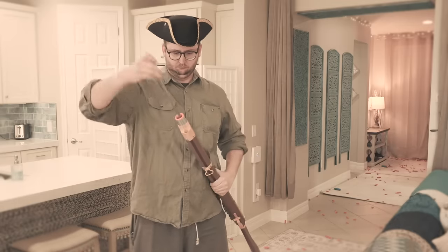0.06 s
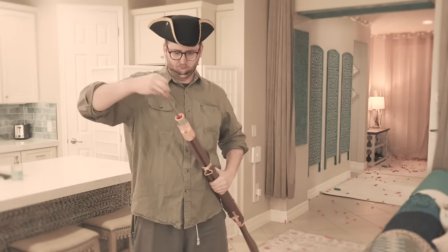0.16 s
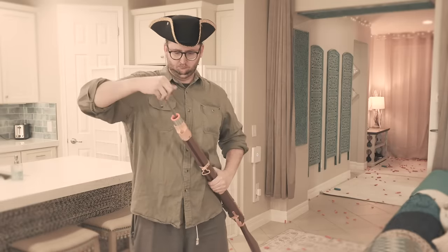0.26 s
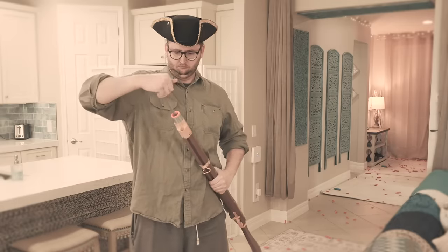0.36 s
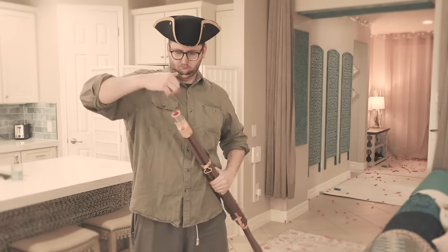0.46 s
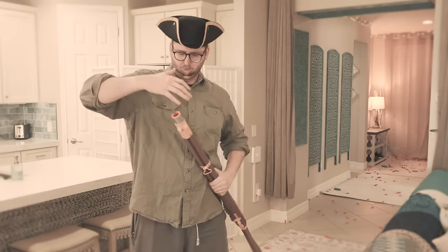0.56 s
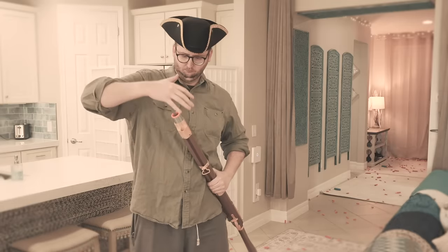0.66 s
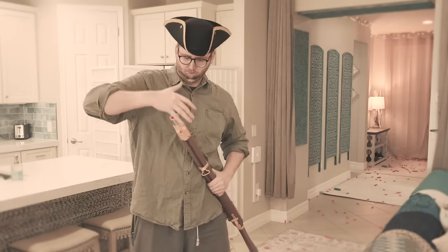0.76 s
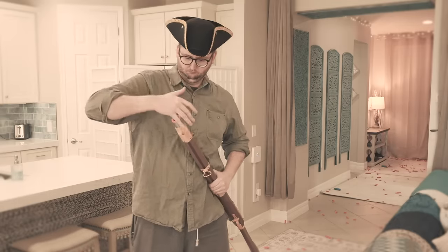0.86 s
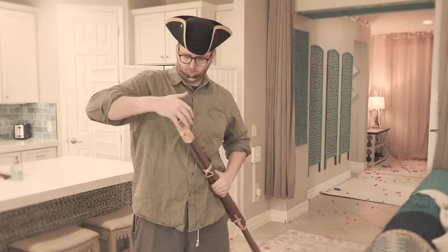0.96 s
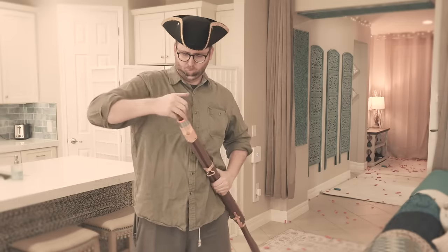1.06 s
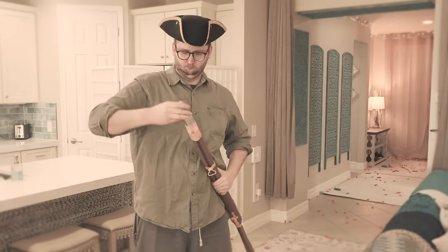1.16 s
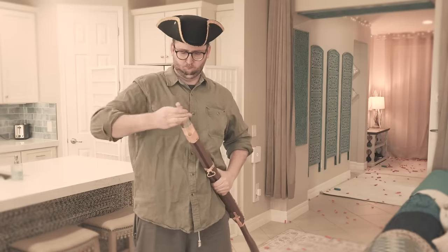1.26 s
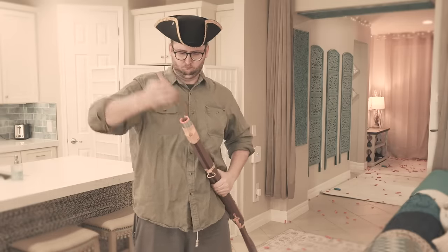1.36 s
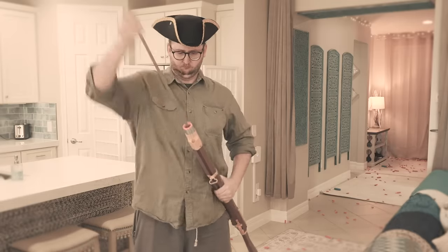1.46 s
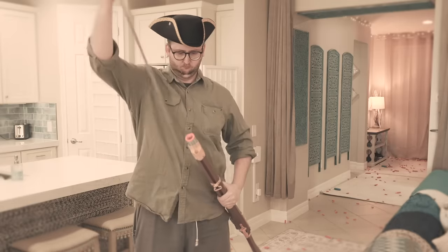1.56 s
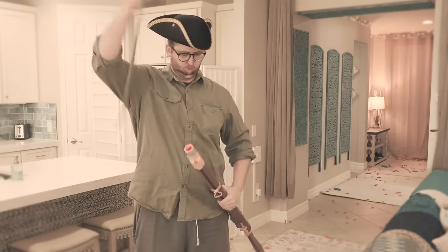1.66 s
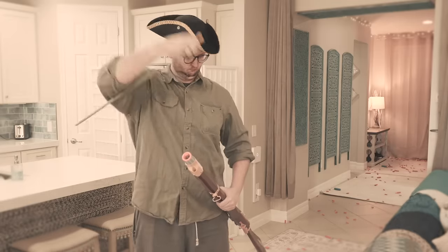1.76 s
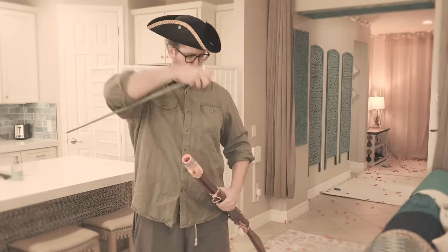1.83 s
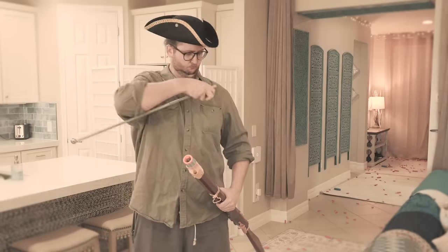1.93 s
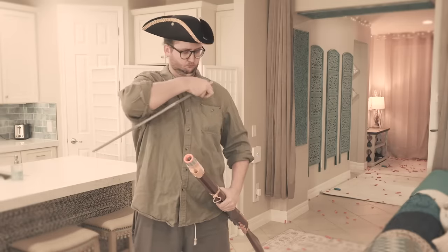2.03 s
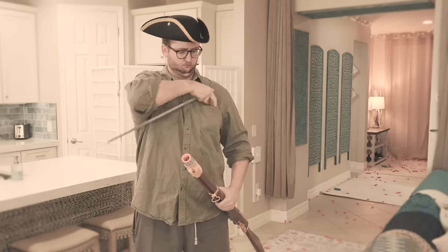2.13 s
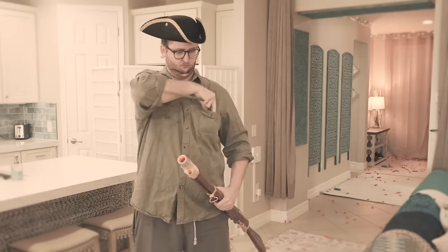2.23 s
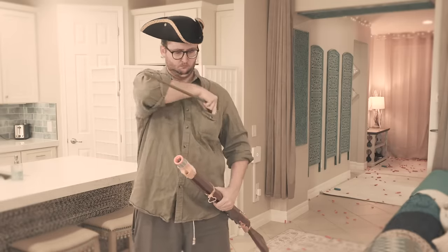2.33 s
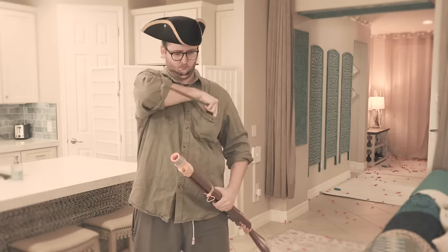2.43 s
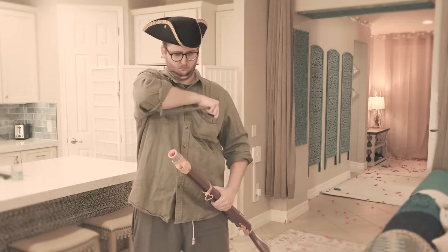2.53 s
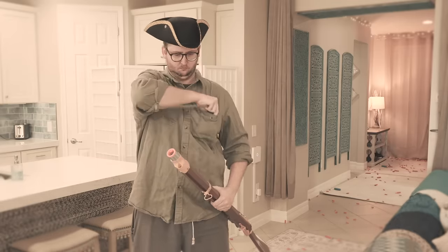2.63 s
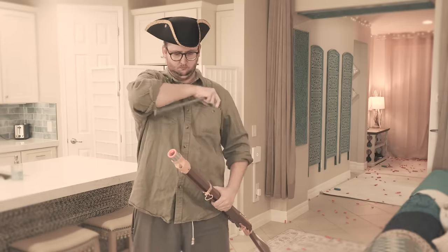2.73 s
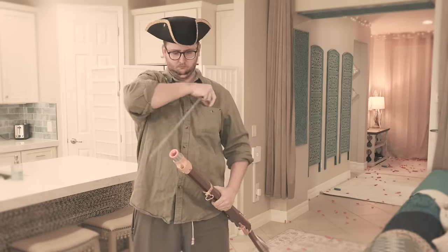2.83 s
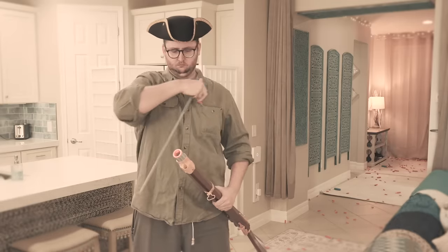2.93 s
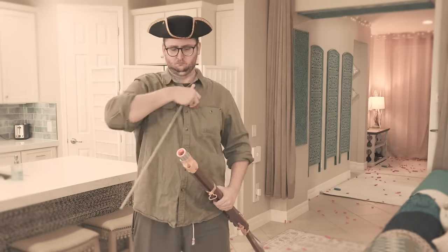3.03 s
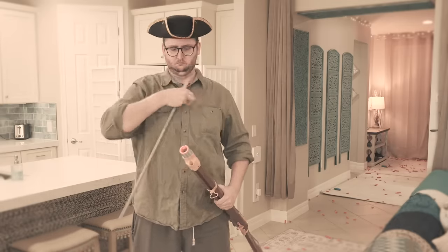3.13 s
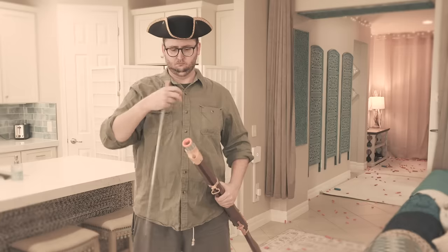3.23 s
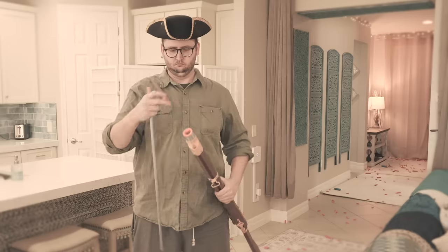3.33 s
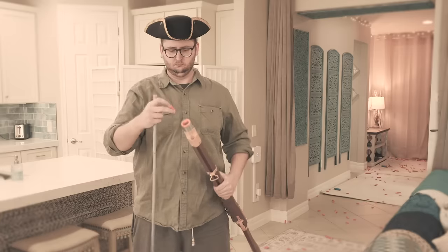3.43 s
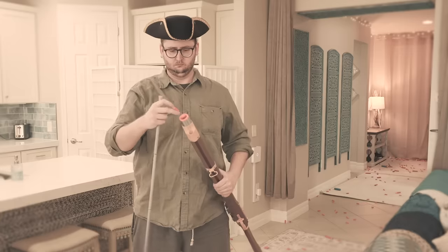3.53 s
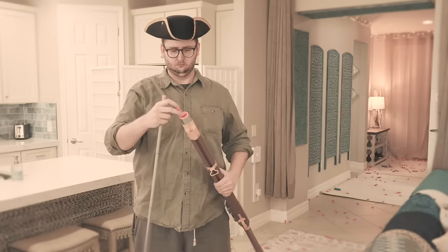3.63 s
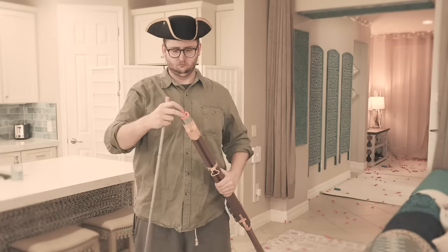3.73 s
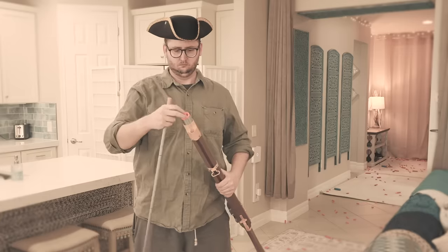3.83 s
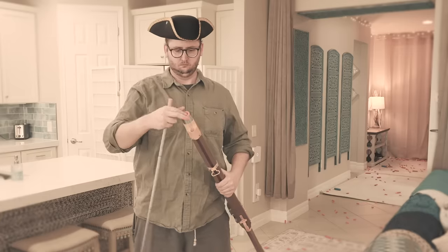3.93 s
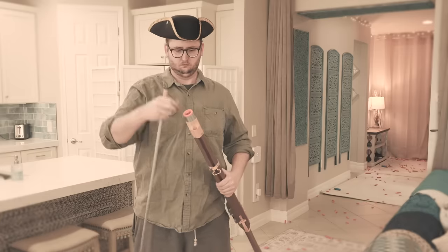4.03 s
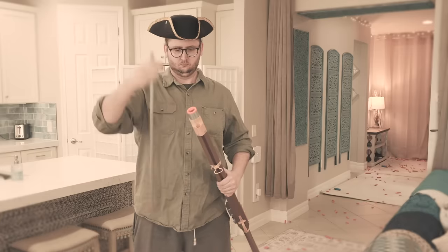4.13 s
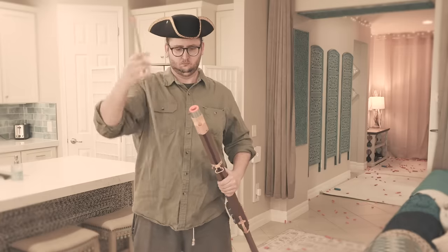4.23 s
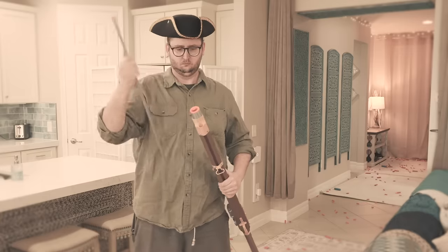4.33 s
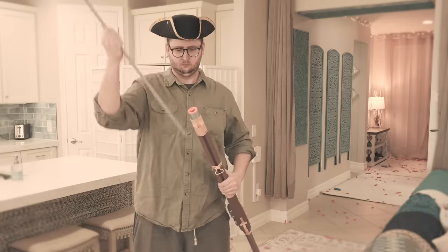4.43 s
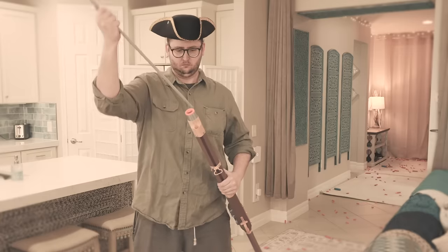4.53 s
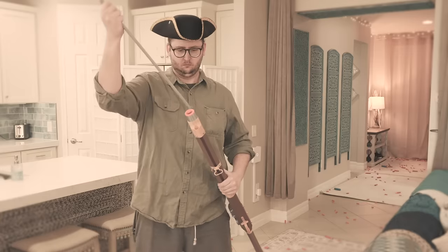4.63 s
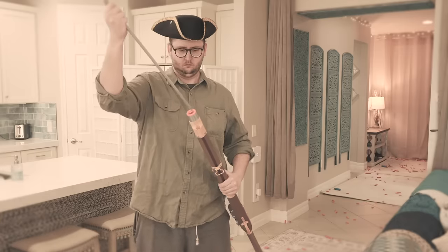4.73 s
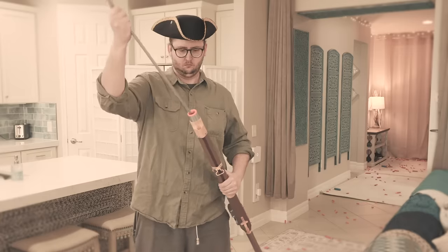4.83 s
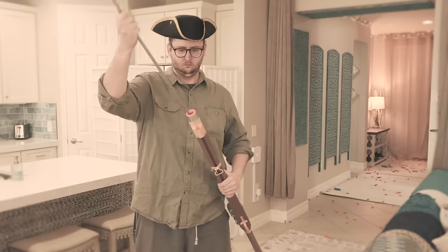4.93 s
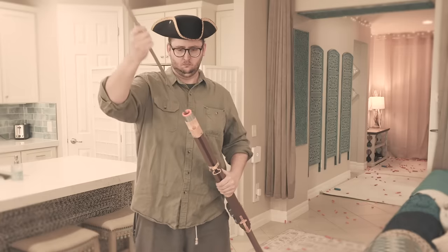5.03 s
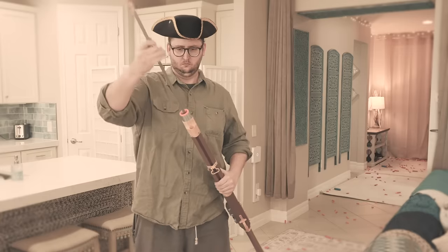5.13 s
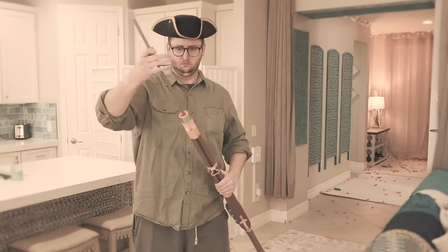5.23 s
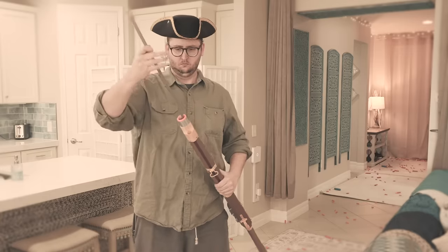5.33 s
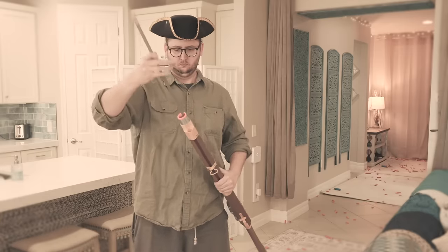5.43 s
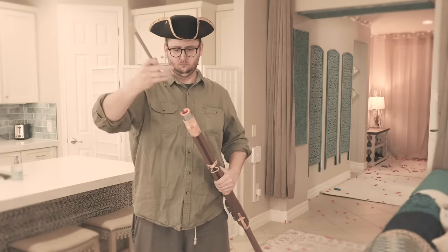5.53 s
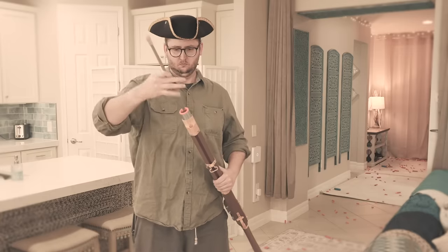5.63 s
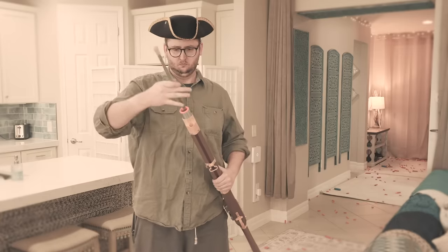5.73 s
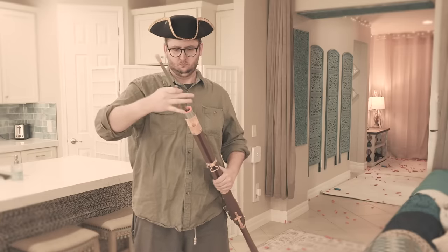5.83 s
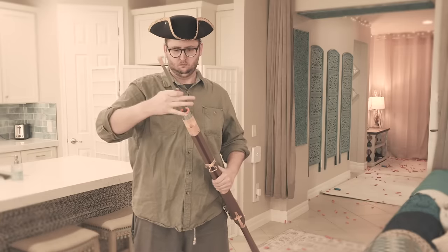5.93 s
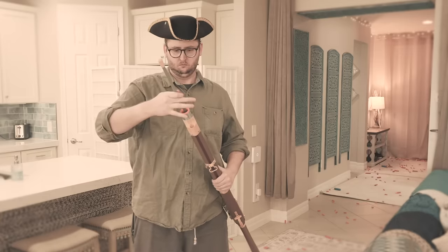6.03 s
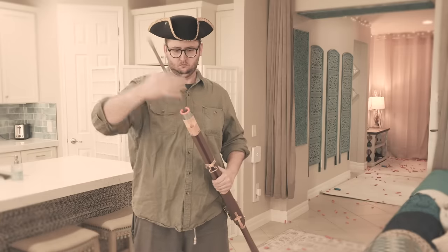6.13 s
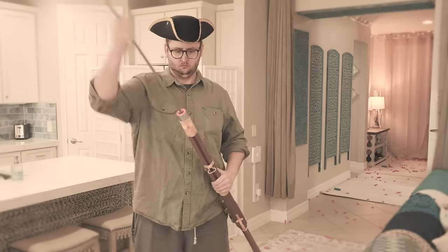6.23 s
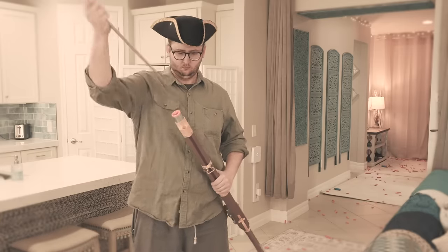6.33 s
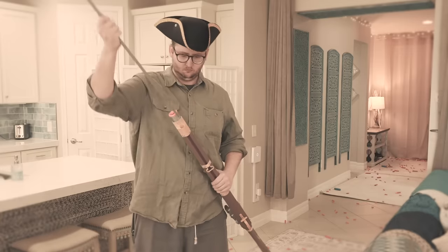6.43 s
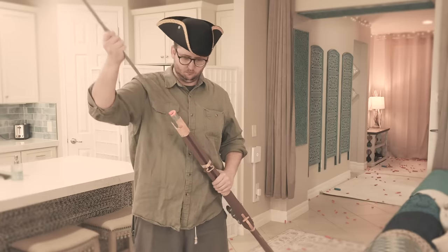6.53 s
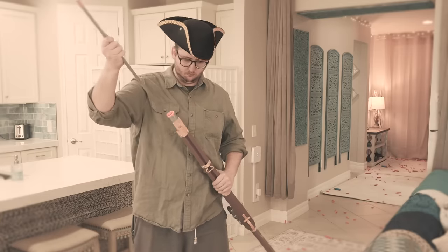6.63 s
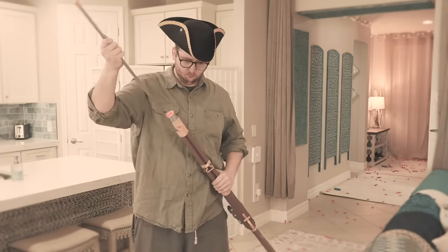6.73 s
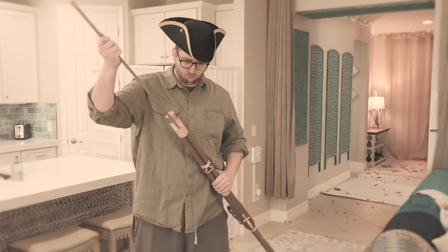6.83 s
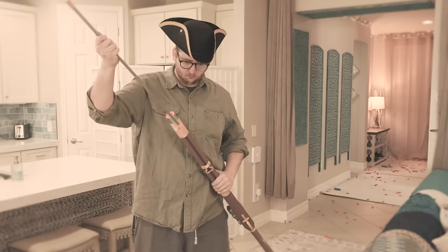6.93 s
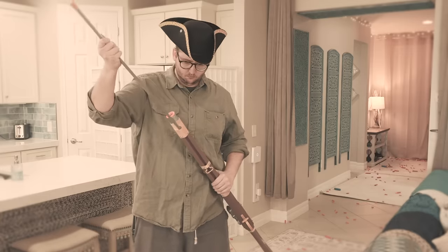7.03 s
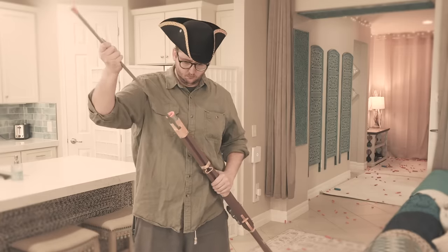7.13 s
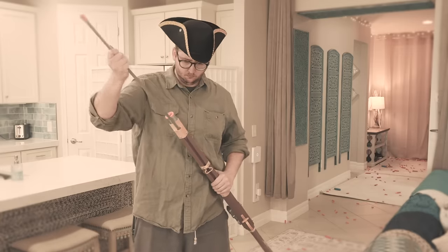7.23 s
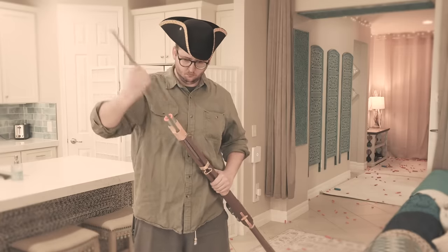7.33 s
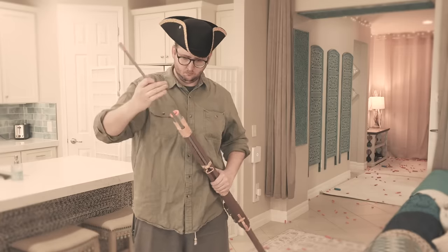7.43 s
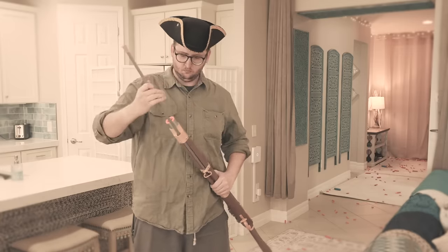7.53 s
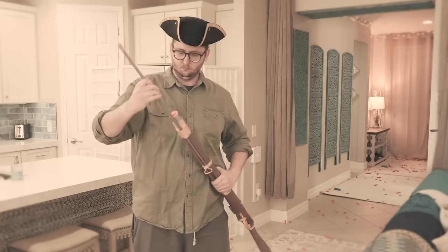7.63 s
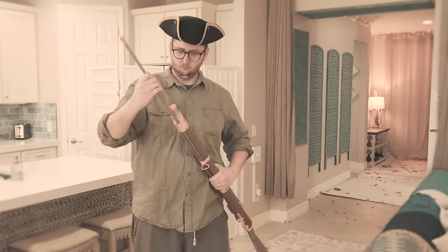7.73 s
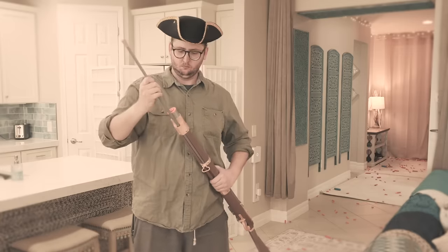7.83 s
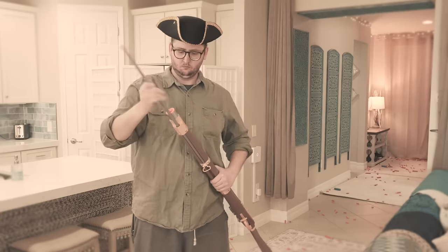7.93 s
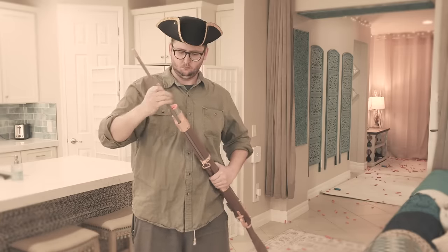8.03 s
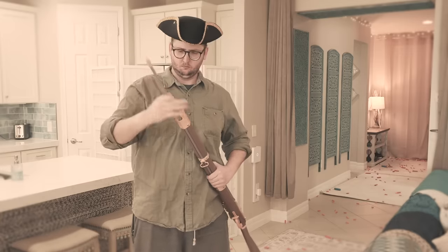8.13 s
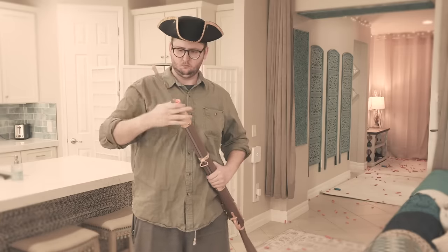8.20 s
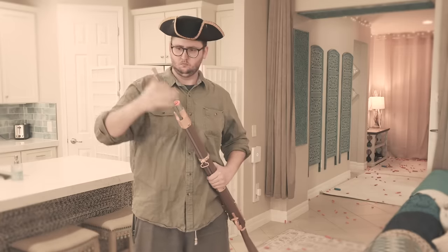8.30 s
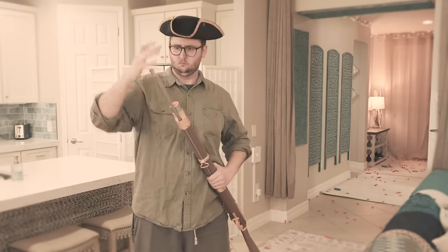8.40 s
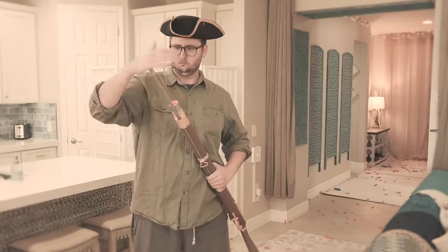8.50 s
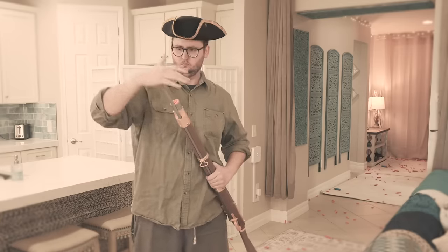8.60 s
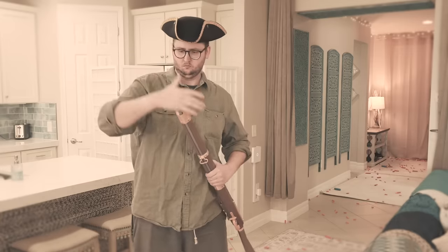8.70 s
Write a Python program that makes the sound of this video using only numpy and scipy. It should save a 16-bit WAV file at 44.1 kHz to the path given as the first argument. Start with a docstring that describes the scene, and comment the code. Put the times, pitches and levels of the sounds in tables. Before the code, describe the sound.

In a quiet living room, a ramrod clicks and rasps in a toy musket's plastic barrel, with a low hollow knock and two loud sharp snaps as it comes free. A few seconds of near silence follow, with faint cloth rustle and soft rod taps. Then it ticks, squeaks briefly, scrapes and knocks its way back in. Close mono microphone, short room reverb, faint refrigerator hum.

```python
"""In a living room with an open kitchen, a ramrod is worked in the plastic barrel of a toy musket.
It scrapes along the bore (friction noise through tube resonances), knocks home (impulses on the wall
and stock), snaps free of the muzzle and is turned in the hand (bending modes, rustling cloth),
then taps its way back in and slides down. Behind it a refrigerator hums (beating sinusoids) in still
air (shaped noise), with a faint drone (narrow-band noise)."""
import sys
import numpy as np
from scipy import signal
from scipy.fft import rfft, irfft, next_fast_len
from scipy.io import wavfile
from scipy.ndimage import uniform_filter1d, map_coordinates

SR = 44100
rng = np.random.default_rng(int(sys.argv[2]) if len(sys.argv) > 2 else 0)


def put_to_file(sound):
    """Save the sound as 16-bit audio at rate SR, in the file named by the first command-line argument."""
    columns = np.atleast_2d(sound).T  # one column per channel
    safe = np.clip(columns, -1, 1)
    whole_steps = np.round(safe * 32767)
    wavfile.write(sys.argv[1], SR, whole_steps.astype(np.int16))


N = 386438
SIZE = 16384  # samples in one short sound, and in a colouring filter

# a tap on the plastic wall, spectrum: (f/Hz, level/dB)
WALL_SPECTRUM = [(130, -25.5), (330, -7.5), (600, -7), (900, 3), (2200, 1), (3200, 2.5), (5400, -3),
                 (6600, -6), (10500, -7), (15500, -21.5)]
# wall modes favoured by soft, medium and hard contacts: (f/Hz)
WALL_MODES = [2250, 3020, 5100]
# what hardness does to a click: (softest contact, hardest contact)
BODY_DB = (9, -13.5)  # spectrum at and below 1500 Hz
CHATTER_T60_S, RISE_S = (0.057, 0.027), (0.0011, 0.0004)
SNAP = (2.5, 4.7)  # amplitude of the first touch, over the chatter


def click(hardness, edge_db, tube_db=5, mode_db=5, mode_width_hz=400):
    """Impact excitation: a snap and chatter ring the wall; harder is shorter, thinner and higher."""
    t = np.arange(SIZE) / SR
    rise = 1 - np.exp(-t / between(RISE_S, hardness))
    chatter = rng.standard_normal(SIZE) * fade(t, between(CHATTER_T60_S, hardness)) * rise
    chatter[0] = between(SNAP, hardness)
    contact = [(1500, between(BODY_DB, hardness)), (2600, 0), (5600, 0.0098), (7500, edge_db)]
    # hardness crossfades from each wall mode to the next
    mode_position = 2 * np.clip(hardness, 0, 1)
    shares = np.maximum(1 - np.abs(mode_position - np.arange(len(WALL_MODES))), 0)

    def colour(hz):
        """Modal superposition: wall, contact, tube and favoured modes add in dB."""
        modes = sum(share * bump(hz, centre, mode_width_hz) for share, centre in zip(shares, WALL_MODES))
        return along(WALL_SPECTRUM, hz) + along(contact, hz) + tube_db * barrel(hz) + mode_db * modes

    return unit_peak(coloured(chatter, colour))


CLICK_WET_DB = (-5.5, -8)  # room re the direct sound: (softest contact, hardest contact)
# rod against barrel: (t/s, level/dB before a common trim, hardness 0-1, edge from 7.5 kHz up/dB)
ROD_CLICKS = [(0.026, -25.5, 0.97, -1), (0.0403, -25, 0.91, 0.5), (0.2109, -32, .85, -5.5),
              (0.2298, -31.5, 0.2, -2.5), (0.2438, -27.5, 0.09, -2.5), (0.7224, -45, 0.65, 0.5),
              (0.788, -31.5, 0.7, -8), (0.8659, -15, .95, -7.5), (1.1196, -38, 0.07, -7.5),
              (1.1412, -37.5, 0, -6.5), (1.4296, -37.5, 1, -1), (1.5291, -17.5, 0.93, 4.5),
              (4.8581, -38, 0.67, -10), (4.9044, -38.5, 0.5, -20), (5.2185, -39.5, 0.53, -3.5),
              (5.2344, -25.5, 0.53, -7.5), (5.3927, -38.5, 0.58, -9), (5.4271, -37, 0.32, -6),
              (5.476, -34, 0.21, -1), (5.7803, -44, 0.15, -3), (5.8556, -48, 0.01, -4.5),
              (6.3027, -33, 0.81, 3), (6.5979, -30.5, .6, -7.5), (6.9311, -38, 0.44, -6),
              (7.02, -50, 0.5, -16), (7.4586, -23, 0.92, -7), (7.4611, -23, .75, -2), (7.4654, -26, .3, -6),
              (7.6031, -46.5, 0, -5.5), (7.6914, -42.5, 0.32, -5.5), (7.7533, -44, 0.06, -8),
              (7.9334, -47, 0.32, -8.5), (7.989, -48.5, 0.3, 4.5), (8.0035, -35.5, 0.18, -11.5)]


def clicks():
    """Impact sound: the rod strikes the barrel, and contact hardness sets the spectrum."""
    out = np.zeros(N)
    for s, db, hardness, edge_db in ROD_CLICKS:
        strike = amp(db - 2.5) * click(hardness, edge_db)
        add(out, s, in_room(strike, wet_db=between(CLICK_WET_DB, hardness)))
    return out


# tube resonances of the barrel: (f/Hz, width/Hz, relative weight/dB)
TUBE_MODES = [(1246, 110, -2.5), (1738.5, 250, -12), (2140, 260, -5), (3180, 80, -12.5), (3500, 600, -6.5),
              (5070, 890, 0.5), (5500, 80, -8)]


def barrel(hz):
    """Tube resonance: the weighted sum of the barrel's peaks at each frequency."""
    return sum(amp(db) * bump(hz, centre, width) for centre, width, db in TUBE_MODES)


# rasp at the muzzle, spectrum: (f/Hz, level/dB)
RASP_SPECTRUM = [(900, -42), (1900, -6.5), (2900, 6), (4300, -2), (5300, -2), (6500, -13.5), (8500, -14),
                 (15500, -37)]
# rub inside the bore, spectrum: (f/Hz, level/dB)
RUB_SPECTRUM = [(120, -31.5), (320, 0), (650, -4.5), (1000, 2.5), (1800, -3), (2800, -13), (6000, -45)]
# smooth hiss of the contact, spectrum: (f/Hz, level/dB)
HISS_SPECTRUM = [(3000, -34.5), (6200, 3), (10000, -1), (13000, -5.5), (16000, -17)]
# what depth does to the scrape, in dB re its rasp: (at the muzzle, deep in the bore)
RUB_DB, HISS_DB = (-4, 6), (-6.5, -27)
GRIP_S, GRIP_DOUBLES_DB = 0.0062, 9  # time to take hold; it doubles with this much swell


def scrape(length, swell_db, depth, tube_db=6, judder_db=1.82, ping_db=-1, release=.02):
    """Sliding friction: rasp at the muzzle, rub in the bore, juddering; deeper is hollower and duller."""
    t = np.arange(SIZE) / SR
    progress = np.minimum(t / length, 1)
    grip_s = GRIP_S * 2 ** (swell_db / GRIP_DOUBLES_DB)
    grip = (1 - np.exp(-t / grip_s)) * fade(np.maximum(t - length, 0), release)
    pressure = amp(swell_db * (progress - .5) + judder_db * wobble(155.5)) * grip
    slips = friction(slip_rate=2000, spread_db=2.5, smooth_db=0.5)
    grain = slips + amp(ping_db) * pings(t60=.012, count=1200)
    rasp = unit(coloured(grain, lambda hz: along(RASP_SPECTRUM, hz) + tube_db * barrel(hz)))
    rub = unit(coloured(grain, lambda hz: along(RUB_SPECTRUM, hz) + tube_db * barrel(hz)))
    hiss = unit(coloured(slips, lambda hz: along(HISS_SPECTRUM, hz)))
    contact = rasp + amp(between(RUB_DB, depth)) * rub + amp(between(HISS_DB, depth)) * hiss
    return amp(-4.5) * pressure * contact


def friction(slip_rate, spread_db, smooth_db, size=SIZE):
    """Random impulse process: tiny slips of uneven size, slip_rate a second, over a smooth hiss."""
    struck = rng.random(size) < slip_rate / SR
    slips = struck * rng.standard_normal(size) * amp(spread_db * rng.standard_normal(size))
    return unit(unit(slips) + amp(smooth_db) * rng.standard_normal(size))


def pings(t60, count, size=300):
    """Modal excitation: scattered slips each ring one random wall mode for a few milliseconds."""
    when, pitch, phase = rng.random((3, count, 1))
    t = np.arange(size) / SR
    hz = 600 * 12 ** pitch
    # high modes lie sparser on this log scale, so they are struck harder to keep the sum even
    strength = np.sqrt(hz) * rng.exponential(size=(count, 1))
    grains = strength * np.sin(2 * np.pi * (hz * t + phase)) * fade(t, t60)
    place = (when * SIZE).astype(int) + np.arange(size)
    return unit(np.bincount(place.ravel(), grains.ravel(), minlength=SIZE)[:SIZE])


# the rod is pushed or drawn along the bore:
# (t/s, length/s, relative level/dB, swell from start to end/dB, depth of the contact 0-1)
STROKES = [(0.000, 0.165, -48, -3, .35), (0.45, .21, -71.5, -2, 1), (0.66, .12, -52.5, 15, .85),
           (0.788, .1, -39, -15, .15), (1.1, .18, -58, 0, .9), (1.335, 0.21, -50, 9, 0.49),
           (1.528, .035, -35, -9, 0), (4.92, 0.18, -63, -4.5, 0.48), (5.434, 0.18, -59, -13, .7),
           (5.600, 0.0597, -57.5, 11, .25), (6.134, 0.12, -46, 13, .25), (6.758, .14, -72, 10.5, 0.3),
           (7.014, .24, -64.5, 7.5, 0.55), (7.315, 0.12, -48.5, 18.5, .15), (7.70, 0.37, -64.5, 4, 0.54),
           (8.008, 0.055, -49.5, -6, .2), (8.096, 0.0815, -60.5, 14.5, .35), (8.175, .084, -45.5, -6.5, .1),
           (8.617, .14, -49.5, -2.5, .15)]
# the rod glances off the wall: (t/s, relative level/dB, depth of the contact 0-1)
GLANCES = [(0.018, -41, 0), (0.174, -41, 0.3), (0.386, -36.5, 0.26), (0.403, -34.5, 0.4),
           (1.034, -50.5, 0.83), (1.268, -49.5, 1), (1.44, -45, 0), (1.512, -38.5, 0.23),
           (5.125, -50.5, 0.1), (5.733, -51.5, 0.45), (5.995, -53.5, 0.45), (6.011, -52.5, 0.12),
           (6.638, -43, 0.6), (7.267, -44.5, 0.23), (7.277, -42.5, .15), (8.738, -40, 0.16)]
SCUFF_S, SCUFF_SWELL_DB = .019, -2.5


def slides():
    """Friction noise: strokes along the bore and brief glancing scuffs."""
    out = np.zeros(N)
    for s, length, db, swell_db, depth in STROKES:
        add(out, s, in_room(amp(db) * scrape(length, swell_db, depth), wet_db=-7.5))
    for s, db, depth in GLANCES:
        add(out, s, in_room(amp(db) * scrape(SCUFF_S, SCUFF_SWELL_DB, depth), wet_db=-6.0))
    return out


# the whole stock when knocked, spectrum: (f/Hz, level/dB)
KNOCK_SPECTRUM = [(50, -33), (140, -14.5), (250, -5.5), (420, -3.5), (750, -4.5), (1300, -14), (3000, -45)]
# resonances of the hollow stock: (f/Hz, width/Hz, lift/dB)
STOCK_MODES = [(255, 74, 1), (387, 80, 3.5), (510, 90, 4.5)]
# the rod bottoms out and the stock answers: (t/s, level/dB before a common trim)
STOPS = [(0.243, -29.5), (0.866, -54), (1.529, -51.5), (5.2, -51.5), (5.238, -43.5), (5.485, -47.5),
         (7.459, -39), (7.502, -55)]
THUMP_T60_S = 0.083


def thumps(push=4):
    """Impulse response: a hard stop gives the whole hollow stock one push and a short shudder."""
    def colour(hz):
        """Cavity resonance: the stock's peaks lift its knock spectrum."""
        lifts = sum(lift * bump(hz, centre, width) for centre, width, lift in STOCK_MODES)
        return along(KNOCK_SPECTRUM, hz) + lifts

    out, t = np.zeros(N), np.arange(SIZE) / SR
    for s, db in STOPS:
        shudder = rng.standard_normal(SIZE) * fade(t, THUMP_T60_S)
        shudder[0] = push
        stock = coloured(shudder, colour)
        add(out, s, in_room(amp(db + 2.0) * unit_peak(stock), wet_db=-7))
    return out


# the rod lies loose in the bore and rattles: (from t/s, to t/s)
LOOSE_SPANS = [(1.03, 1.3), (5.7, 6.05), (7.0, 7.25), (7.68, 8.15)]
RATTLE_PER_S, RATTLE_DB, RATTLE_SPREAD_DB = 16, -57.5, 2


def rattle():
    """Random impacts: while it lies loose, the rod ticks lightly on the wall at uneven moments."""
    out = np.zeros(N)
    for start, end in LOOSE_SPANS:
        for s in np.arange(start, end, 1 / RATTLE_PER_S):
            level = amp(RATTLE_DB + RATTLE_SPREAD_DB * rng.standard_normal())
            tick = level * click(hardness=rng.random() / 2, edge_db=-7)
            add(out, s + rng.random() / RATTLE_PER_S, in_room(tick, wet_db=-10.0))
    return out


# the sticking rod: (t/s, f/Hz, level/dB, length/s, glide/octaves per s)
ROD_SQUEAKS = [(5.137, 2725, -54.5, 0.032, 0.5), (5.48, 2810, -42.5, 0.019, 1),
               (5.602, 2470, -63, 0.046, 16.5), (6.297, 4040, -41.5, 0.019, -1.5),
               (7.181, 2790, -46, 0.015, 2.5)]


def squeaks(waver=0.015):
    """Stick-slip oscillation: the rod briefly sings on one wavering pitch that glides up or down."""
    out, t = np.zeros(N), np.arange(SIZE) / SR
    for s, hz, db, length, glide in ROD_SQUEAKS:
        elapsed = np.minimum(t, length)
        pitch = hz * 2 ** (glide * elapsed) * (1 + waver * wobble(830))
        envelope = np.sin(np.pi * elapsed / length) * amp(1.1 * wobble(260))
        tone = np.sin(2 * np.pi * np.cumsum(pitch) / SR) * envelope
        add(out, s, in_room(amp(db) * unit_peak(tone), wet_db=-12))
    return out


# bending modes of the free rod: (f/Hz, mean level/dB, t60/s)
ROD_MODES = [(599, -6, 0.094), (1280, -9.5, 0.087), (1480, -6, 0.093), (1847, -5, 0.052),
             (2110, -11, 0.048), (3054, -3.5, 0.039)]
# fingers knock the free rod: (t/s, level/dB before a common trim)
FINGER_TAPS = [(3.667, -67), (3.689, -69.5), (3.938, -66), (3.965, -68.5), (4.030, -68.5), (4.050, -67),
               (4.168, -51)]


def taps(touch_db=-3, touch_t60=0.065, tick_db=-3, rise=0.0032):
    """Free-bar vibration: out of the barrel, the rod answers with a soft tick and bending modes."""
    def colour(hz):
        """Spectral envelope: the stronger of rub and cloth at each frequency."""
        return np.maximum(along(RUB_SPECTRUM, hz), along(CLOTH_SPECTRUM, hz) + tick_db)

    out, t = np.zeros(N), np.arange(SIZE) / SR
    for s, db in FINGER_TAPS:
        ring = np.zeros(SIZE)
        for hz, level, t60 in ROD_MODES:
            ring += amp(level + 2 * rng.standard_normal()) * np.sin(2 * np.pi * hz * t) * fade(t, t60)
        touch = coloured(rng.standard_normal(SIZE) * fade(t, touch_t60), colour)
        tap = (unit_peak(ring) + amp(touch_db) * unit_peak(touch)) * (1 - np.exp(-t / rise))
        add(out, s, in_room(amp(db + 4.0) * tap, wet_db=-8.5))
    return out


# rustling cloth, spectrum: (f/Hz, level/dB)
CLOTH_SPECTRUM = [(150, -4.5), (600, -8), (2000, -6), (5000, -7.5), (8000, -16.5), (15000, -15.5)]
# shirt cloth and fingers as the rod is turned over: (t/s, length/s, level/dB)
RUSTLES = [(2.25, .12, -73), (2.4, 0.22, -76), (2.67, .094, -75.5), (2.85, 0.35, -82.5),
           (3.075, .06, -74.5), (3.17, .016, -66), (3.788, .06, -71.5), (3.983, 0.089, -73.5)]


def sleeve():
    """Fibre friction: shirt cloth rustles faintly in short strokes as the arm turns the rod over."""
    out, t = np.zeros(N), np.arange(SR // 2) / SR
    for s, length, db in RUSTLES:
        grain = friction(slip_rate=600, spread_db=3.5, smooth_db=0.5, size=len(t))
        rustle = unit(coloured(grain, lambda hz: along(CLOTH_SPECTRUM, hz)))
        stroke = np.sin(np.pi * np.minimum(t / length, 1))
        add(out, s, in_room(amp(db) * stroke * rustle, wet_db=-5))
    return out


# still room air, spectrum: (f/Hz, level/dB)
AIR_SPECTRUM = [(20, -7), (45, -8), (70, -11), (100, -6.5), (135, -11), (170, -18), (260, -21),
                (350, -19.5), (430, -23.5), (600, -23), (1400, -31), (5200, -38), (11500, -45.5),
                (13000, -55.5), (16000, -61.5)]
# steady refrigerator lines: (f/Hz, level/dB)
HUM_LINES = [(91.6, -76), (118.6, -80.5), (120, -73.5)]


def kitchen(mains_db=-71, motor_db=-74):
    """Beating: a refrigerator motor lags the mains, so the two beat slowly, in still air."""
    t = np.arange(N) / SR
    mains_hz, beat_period_s, beat_null_s = 60, 1.49, 1.25
    mains = 2 * np.pi * mains_hz * t
    lag = 2 * np.pi * (t - beat_null_s) / beat_period_s
    hum = amp(mains_db) * np.sin(mains) - amp(motor_db) * np.sin(mains - lag)
    for hz, db in HUM_LINES:
        hum += amp(db) * np.sin(2 * np.pi * (hz * t + rng.random()))
    air = unit(coloured(rng.standard_normal(N), lambda hz: along(AIR_SPECTRUM, hz)))
    return np.sqrt(2) * hum + amp(-71.5) * air  # root 2 makes the hum levels rms


# a faint narrow drone swells and fades in the room: (t/s, length/s, level/dB)
DRONE_SWELLS = [(2.548, 0.91, -77.5), (3.81, 0.89, -82)]
DRONE_HZ, DRONE_WIDTH_HZ = 354.4, 60


def drone():
    """Narrow-band noise: noise through a single resonance swells and fades faintly."""
    t = np.arange(N) / SR
    level = np.zeros(N)
    for s, length, db in DRONE_SWELLS:
        level += amp(db) * np.sin(np.pi * np.clip((t - s) / length, 0, 1))
    resonance = bump(np.fft.rfftfreq(N, 1 / SR), DRONE_HZ, DRONE_WIDTH_HZ)
    return level * unit(irfft(rfft(rng.standard_normal(N)) * resonance, N))


# reverberation time of the room: (f/Hz, t60/s)
ROOM_T60 = [(200, 0.58), (530, 0.43), (1400, 0.37), (3700, 0.31), (9700, 0.25), (15000, .2)]


def in_room(x, wet_db, build=.006):
    """Reverberation: the direct sound and a diffuse tail that builds up, then dies faster in the treble."""
    hz, t, z = signal.stft(rng.standard_normal(SR * 2 // 3), SR, nperseg=256)
    decay = amp(-60 * t / along(ROOM_T60, hz)[:, None])
    tail = signal.istft(z * decay, SR, nperseg=256)[1]
    tail = tail * (1 - np.exp(-np.arange(len(tail)) / SR / build))
    response = amp(wet_db) * tail / np.linalg.norm(tail)
    response[0] += 1
    return signal.fftconvolve(x, response)


def coloured(x, colour):
    """Minimum-phase filtering: x through the causal filter whose gain in dB is colour(Hz)."""
    cepstrum = irfft(np.log(amp(colour(np.fft.rfftfreq(SIZE, 1 / SR))) + 1e-6))
    # folding the cepstrum onto positive time makes the filter causal
    cepstrum[1:SIZE // 2] *= 2
    cepstrum[SIZE // 2 + 1:] = 0
    return signal.fftconvolve(x, irfft(np.exp(rfft(cepstrum))))[:len(x)]


def bump(hz, centre_hz, width_hz):
    """Lorentzian resonance: a peak of height 1 and the given width at half height."""
    return 1 / (1 + (2 * (hz - centre_hz) / width_hz) ** 2)


def fade(t, t60):
    """Exponential decay: 60 dB in t60 seconds, or in 2 ms if t60 is less."""
    return 1000. ** (-t / max(t60, .002))


def wobble(rate):
    """Random modulation: a short smooth random curve, rate knots a second."""
    knots = rng.standard_normal(int(SIZE * rate / SR) + 4)
    return map_coordinates(knots, [np.arange(SIZE) * rate / SR])


def along(points, hz):
    """Logarithmic frequency scale: (Hz, value) points interpolated on a log axis."""
    f, v = np.transpose(points)
    return np.interp(np.log(hz + 1), np.log(f), v)


def between(ends, share):
    """Linear interpolation: the value a share of the way from one end to the other."""
    return ends[0] + (ends[1] - ends[0]) * np.clip(share, 0, 1)


def amp(db):
    """Level: decibels to gain."""
    return 10 ** (np.asarray(db) / 20)


def unit(x):
    """Effective value: scale to rms 1."""
    return x / np.sqrt(np.mean(x ** 2) + 1e-20)


def unit_peak(x):
    """Short-time effective value: scale so that the loudest two milliseconds have rms 1."""
    return x / np.sqrt(uniform_filter1d(x ** 2, size=88).max())


def add(track, s, sound):
    """Superposition: mix a sound into the track at time s."""
    start = max(round(s * SR), 0)
    track[start:start + len(sound)] += sound[:N - start]


def scene():
    """Superposition: all sources add at one microphone."""
    musket = clicks() + slides() + thumps() + rattle() + squeaks()
    hand = taps() + sleeve()
    background = kitchen() + drone()
    return (musket + hand + background)[None]


def record(dry, top_hz=16200):
    """Band limiting: nothing is kept at or above top_hz."""
    m = next_fast_len(N + SIZE)
    kept = np.fft.rfftfreq(m, 1 / SR) < top_hz
    return irfft(rfft(dry, m) * kept, m)[..., :N]


dry = scene()
out = record(dry)
put_to_file(out)
```